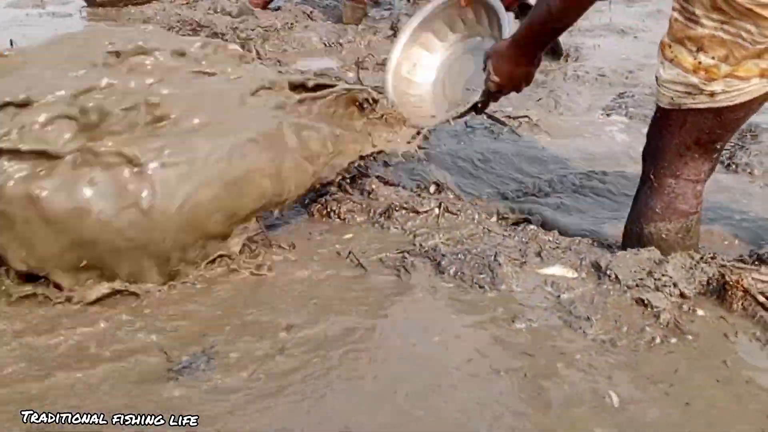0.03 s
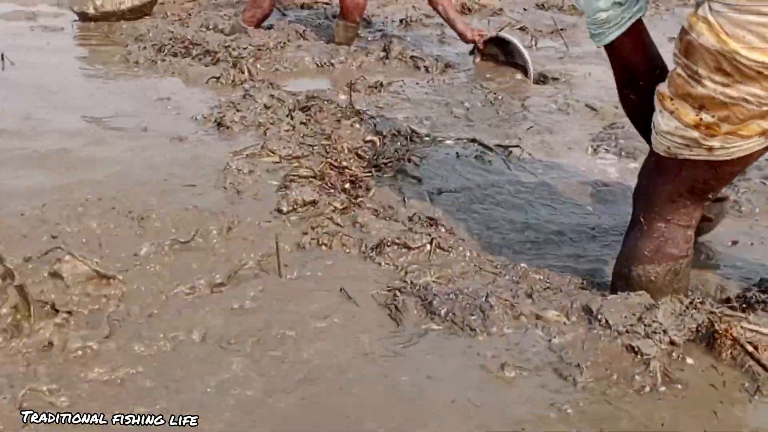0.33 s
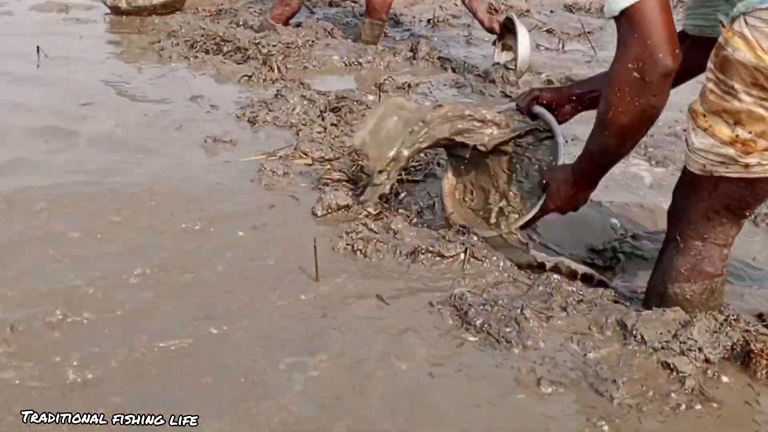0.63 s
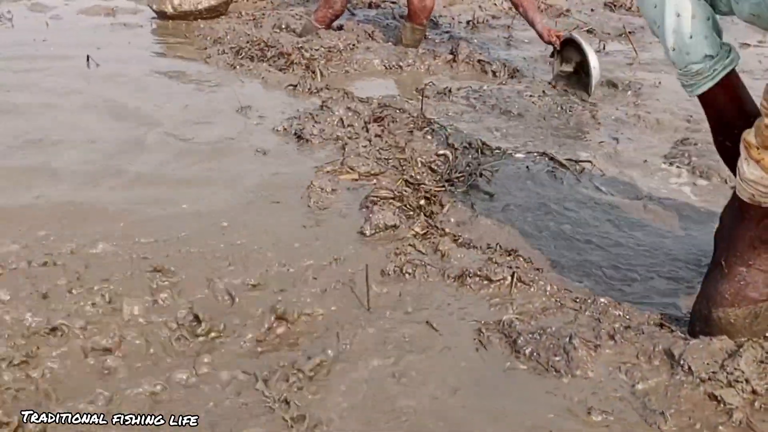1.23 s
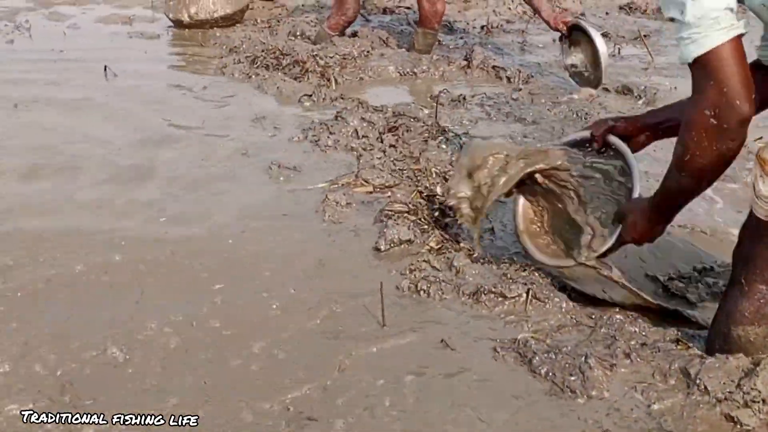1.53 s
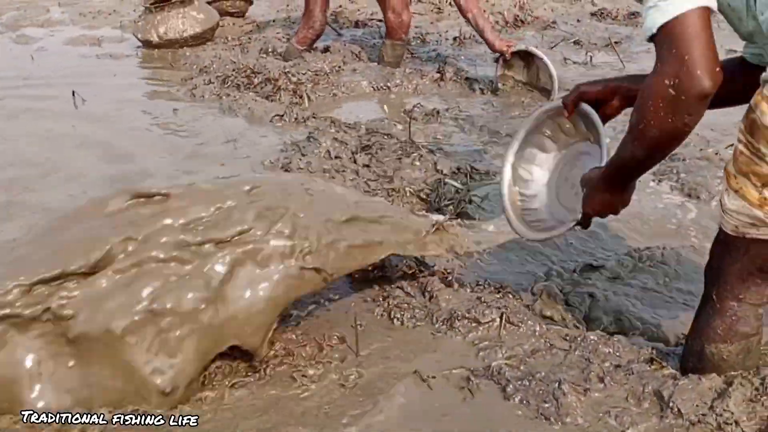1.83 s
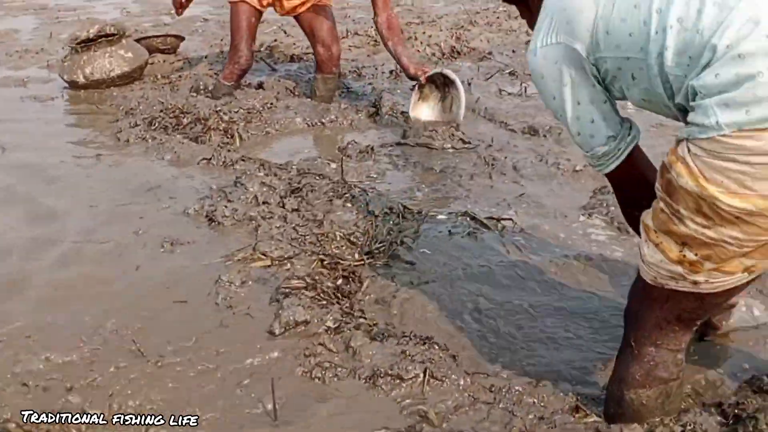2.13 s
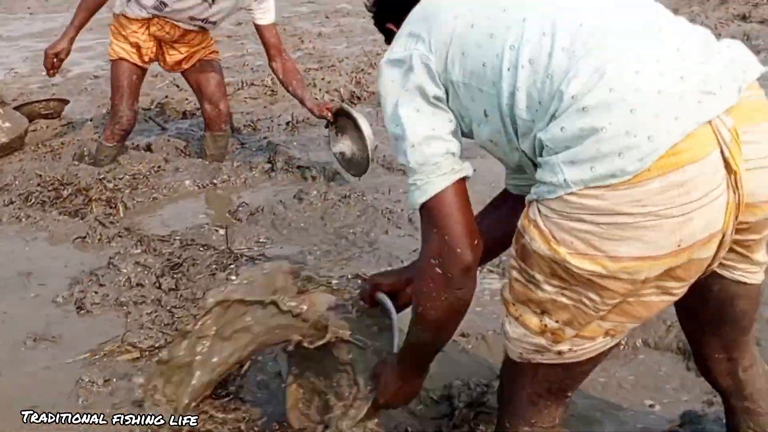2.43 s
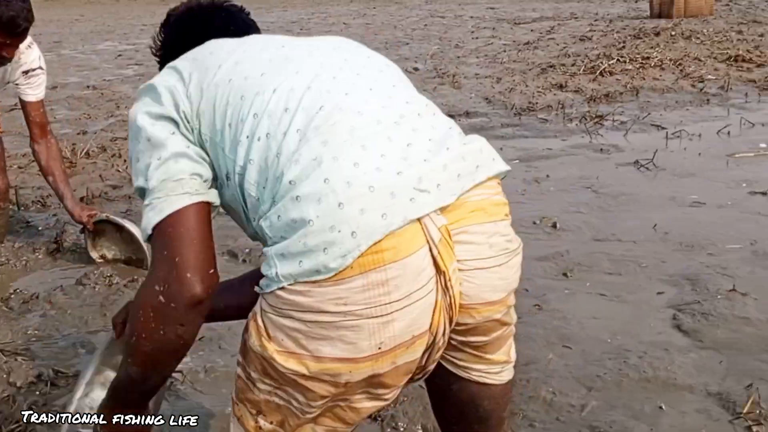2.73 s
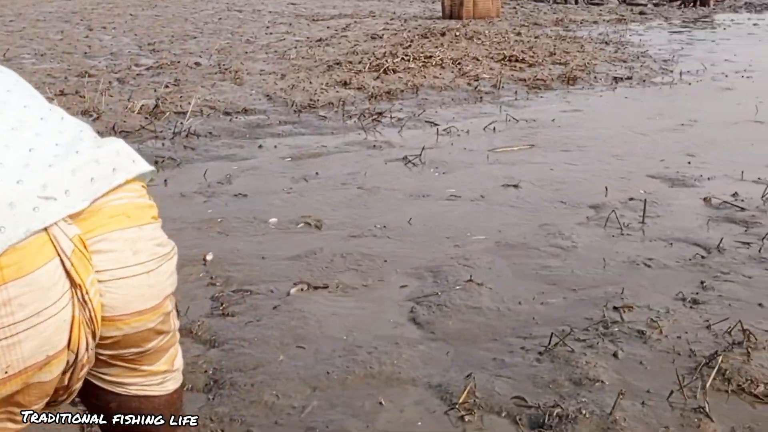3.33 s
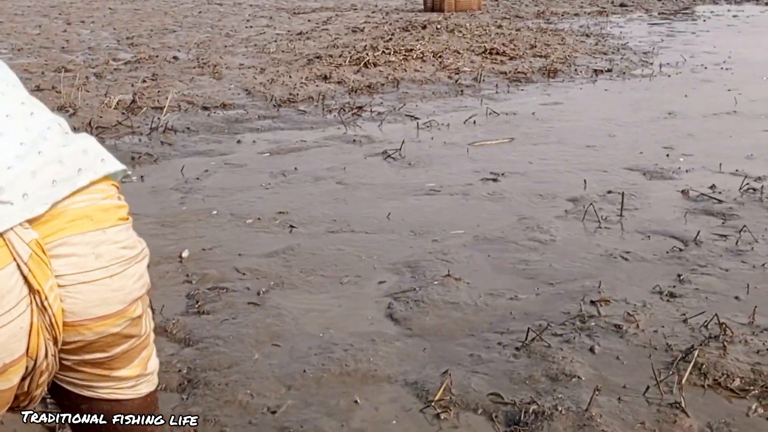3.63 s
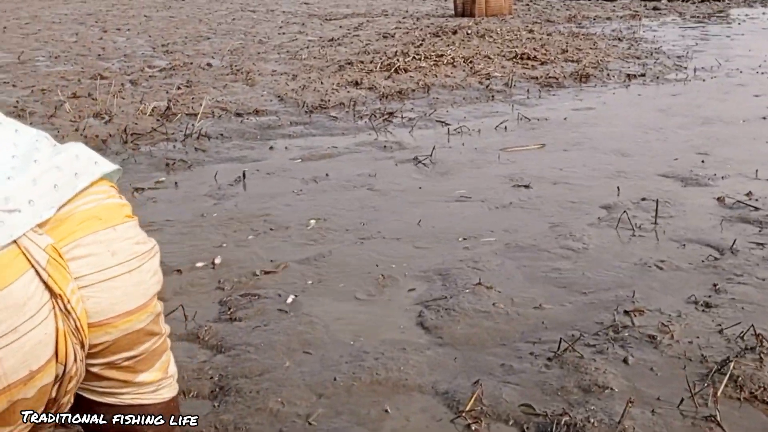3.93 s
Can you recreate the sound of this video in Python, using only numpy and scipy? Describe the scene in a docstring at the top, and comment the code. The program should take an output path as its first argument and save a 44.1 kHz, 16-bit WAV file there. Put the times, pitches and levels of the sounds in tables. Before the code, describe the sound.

Repeated splashes of thrown muddy water, with small drips and a faint, distant engine thudding.

```python
"""Five splashes of muddy water, bailed out of a flooded field with metal bowls. Each throw is a sheet
that hisses as it tears in the air, plunges into the shallows and rains down as spray, bubbles and
slapping lumps; the last two are closer and brighter. Water drips, and the bowl gulps and spatters as
it scoops. Far off, a slow single-cylinder engine, probably a pump, thuds steadily in the open air."""
import sys
import numpy as np
from scipy import signal
from scipy.fft import rfft, irfft, next_fast_len
from scipy.io import wavfile
from scipy.ndimage import uniform_filter1d, minimum_filter1d, map_coordinates

SR = 44100
rng = np.random.default_rng(int(sys.argv[2]) if len(sys.argv) > 2 else 0)


def generate_wav(signal):
    """Clip the signal to [-1, 1] and save it as 16-bit WAV at the path in sys.argv[1]."""
    frames = np.transpose(np.atleast_2d(signal))
    scaled = np.clip(frames, -1, 1) * 32767
    pcm = np.round(scaled).astype(np.int16)
    wavfile.write(sys.argv[1], SR, pcm)


N = 176400

# Fader moves, one list per throw. Each row: time in seconds, then spray, churn and plunge faders in dB.
THROW_FADERS = [
    [(0.0, -29.5, -25, -51), (0.09, -32.5, -38.5, -41), (0.14, -23.5, -29, -32), (0.205, -24.5, -41, -38.5),
     (0.26, -21, -20.5, -29.5), (0.33, -26, -29, -33.5), (0.41, -26.5, -27, -43), (0.55, -34.5, -44, -53.5),
     (0.69, -45.5, -54, -52.5)],
    [(0.78, -40.5, -44.5, -53), (0.85, -41, -48, -56), (0.95, -33, -33, -54), (1.04, -26, -28.5, -31.5),
     (1.1, -26.5, -34, -34.5), (1.15, -20, -27.5, -27), (1.21, -27, -25.5, -35), (1.32, -28.5, -31, -47),
     (1.46, -36.5, -45.5, -61), (1.58, -50.5, -48.5, -57)],
    [(1.71, -47, -57, -54), (1.84, -37, -38, -52), (1.91, -29, -30.5, -36.5), (1.96, -31.5, -35, -41.5),
     (2.03, -20, -21, -24), (2.09, -22.5, -24.5, -30.5), (2.13, -28, -29.5, -33),
     (2.21, -26.5, -29.5, -44.5), (2.41, -49, -48, -57)],
    [(2.5, -35, -40, -45.5), (2.62, -42, -45.5, -56), (2.69, -33.5, -29, -37), (2.85, -22, -26.5, -32.5),
     (2.95, -18.5, -26.5, -33), (3.03, -17.5, -24.5, -32), (3.09, -23, -26, -41), (3.19, -24, -31, -46),
     (3.3, -30, -41.5, -56)],
    [(3.39, -33, -48, -46.5), (3.47, -28, -42, -45), (3.57, -27, -27.5, -40.5), (3.64, -21, -25.5, -33),
     (3.74, -17.5, -25, -25), (3.82, -19, -24, -32.5), (3.92, -26.5, -33.5, -37), (4.0, -23, -24.5, -36.5)],
]
# The brightness that closeness adds to spray and hiss. Each row: frequency in Hz, gain in dB.
CLOSE_EQ = [(1100, -3.5), (2700, 0.5), (4150, 4.5), (5000, -4.5), (6200, 3.5), (10000, 2)]
def throws(close_from_s=2.44, hiss_lead_s=0.017):
    """Thrown water tears, then lands; more water makes denser drops and bubbles."""
    t = np.arange(N) / SR
    times, *faders = np.transpose(np.vstack(THROW_FADERS))
    spray_db, churn_db, plunge_db = [np.interp(t, times, fader) for fader in faders]
    hiss_db = 0.98 * np.interp(t + hiss_lead_s, t, spray_db)  # follows the spray, just ahead of it
    density = amp(0.6 * (spray_db - spray_db.max()))
    clumps_db = clumps()
    drops = patter(density, rate=1500, spread_db=1.5, wash=0.2)
    top = spray(density, drops) * amp(spray_db - 2 + clumps_db)
    body = churn(density) * amp(churn_db + clumps_db / 2)
    weight = plunge(density) * amp(plunge_db)
    top += hiss(density, drops) * amp(hiss_db - 12 + clumps_db / 2)
    close = np.clip((t - close_from_s) * 10, 0, 1)  # a 0.1 s crossfade
    return (1 - close) * top + close * colour(top, CLOSE_EQ) + body + weight


def clumps(per_second=42, depth_db=1.38):
    """Level swings in dB: each clump of water lands at once and fades."""
    hits = rng.exponential(size=N) * (rng.random(N) < per_second / SR)
    energy = signal.lfilter([1], [1, -np.exp(-1 / (0.0088 * SR))], hits)
    swell = np.sqrt(np.abs(energy))
    return depth_db * unit(swell - swell.mean())


# The upper-mid presence of falling drops. Each row: frequency in Hz, gain in dB.
SPRAY_EQ = [(300, -48.5), (1000, -23), (1600, 1.5), (2200, 3), (2900, 1), (3500, -13), (4100, -26),
            (12000, -110)]
def spray(density, drops):
    """Drops rain onto the surface and small bubbles tinkle."""
    tinkle = bubbles(density, rate=410, centre_hz=2441, octaves=0.305, ring=41.8, rise=0.295, spread_db=2.5)
    return unit(colour(drops, SPRAY_EQ)) + amp(-3) * muffle(tinkle)


# The midrange body of stirred water. Each row: frequency in Hz, gain in dB.
CHURN_EQ = [(250, -27), (650, -2.5), (850, 0), (1400, 3.5), (2000, 2.5), (12000, -105)]
def churn(density):
    """Stirred water sloshes and gurgles with mid-sized bubbles."""
    gurgle = bubbles(density, rate=300, centre_hz=1216, octaves=0.343, ring=25, rise=0.11, spread_db=0.5)
    slosh = patter(density, rate=1000, spread_db=5, wash=0.28)
    return muffle(gurgle + unit(colour(slosh, CHURN_EQ)))


# The low weight of the landing. Each row: frequency in Hz, gain in dB.
PLUNGE_EQ = [(60, -35.5), (170, -6), (350, -8.5), (700, 1), (1100, -17.5), (12000, -110)]
def plunge(density):
    """Heavy water drives into the shallows and large cavities ring."""
    cavities = bubbles(density, rate=220, centre_hz=472, octaves=0.542, ring=12, rise=0.098, spread_db=3.5)
    impacts = patter(density, rate=700, spread_db=2, wash=0.63)
    return muffle(0.89 * cavities + unit(colour(impacts, PLUNGE_EQ)))


# The sizzle on top of a throw; the lift near 15 kHz is the recorder's thin, high edge.
# Each row: frequency in Hz, gain in dB.
HISS_EQ = [(1800, -14), (3300, 14), (4000, 6), (4800, -2), (5600, 0), (6500, -6.5), (7900, -11.5),
           (9300, -23.5), (13500, -30), (15200, -23.5)]
def hiss(density, drops):
    """The sheet tears into mist, with a fizz of tiny bubbles."""
    mist = patter(density, rate=4000, spread_db=4, wash=0.28)
    fizz = bubbles(density, rate=300, centre_hz=6030, octaves=0.255, ring=46, rise=0.1, spread_db=7)
    return unit(colour(mist + 0.1 * drops + 0.28 * fizz, HISS_EQ))


# Wet smacks. Each row: start in seconds, peak before EQ in dB, tone in Hz, 60 dB decay in seconds.
SLAP_HITS = [(.109, -22, 2020, .1), (.219, -7.5, 1440, 0.073), (.249, -12.5, 365, 0.065),
             (0.259, -15, 1500, 0.075), (0.287, -12.5, 1500, 0.1), (.86, -21, 1770, 0.037),
             (.943, -18, 1410, 0.051), (0.991, -19.5, 1950, 0.18), (1.112, -7.5, 1750, 0.18),
             (1.148, -13, 1180, 0.13), (1.256, -27, 1740, 0.033), (1.295, -19, 2020, 0.076),
             (1.655, -28, 1920, 0.057), (1.879, -18.5, 1980, 0.16), (1.974, -16, 1810, 0.17),
             (2.092, -9, 1300, 0.057), (2.156, -14, 2560, .04), (2.31, -23.5, 1490, 0.13),
             (2.414, -26, 1280, 0.04), (2.512, -17.5, 1240, 0.052), (2.571, -18, 1610, 0.019),
             (2.649, -24, 1680, 0.14), (2.783, -8, 1650, 0.044), (2.943, -9, 2600, 0.065),
             (3.042, -5.5, 2200, 0.034), (3.174, -6, 2360, .03), (3.322, -11.5, 2420, 0.034),
             (3.814, -5, 2520, .06), (3.853, -7.5, 1680, 0.018)]
def slaps():
    """Each lump of mud and water lands with a sudden, broad burst that dies at once."""
    out, t = np.zeros(N), np.arange(SR // 8) / SR
    for start, db, hz, t60 in SLAP_HITS:
        band = signal.butter(1, [hz / 1.14, min(hz * 1.4, SR / 3)], 'band', fs=SR)
        noise = signal.lfilter(*band, rng.standard_normal(len(t)))
        add(out, start, at_peak(amp(-60 * t / t60) * noise, db))
    return colour(out, [(80, 5.5), (250, 6.5), (3300, 0.5), (4700, -14.5), (6200, -12), (14000, -54)])


# Plinks. Each row: start in seconds, peak in dB, starting pitch in Hz, 60 dB decay in seconds.
DRIP_NOTES = [(.009, -13, 995, 0.04), (.251, -11.5, 787, 0.088), (.566, -14.5, 2700, 0.0036),
              (0.746, -20, 1290, 0.019), (0.997, -22, 4940, 0.0038), (1.544, -28.5, 1165, 0.036),
              (2.063, -7.5, 922, 0.024), (2.368, -25.5, 2960, .02), (2.513, -17, 1027, 0.053),
              (3.409, -10.5, 3250, 0.0032), (3.409, -27, 5900, 0.007)]
def drips(rise=0.17, attack_s=0.00058):
    """A drip or pocket of air rings as one bubble, rising a little in pitch."""
    out, t = np.zeros(N), np.arange(SR // 10) / SR
    for start, db, hz, t60 in DRIP_NOTES:
        pitch = hz * (1 + rise * np.minimum(t / t60, 1))
        envelope = amp(-60 * t / t60) * (1 - np.exp(-t / attack_s))
        add(out, start, at_peak(envelope * sine(pitch), db))
    return out


# Hollow scoops. Each row: start in seconds, level in dB, pitch in Hz, 60 dB decay in seconds,
# glide in octaves per second.
GULP_NOTES = [(.561, -25, 756, 0.17, -1.5), (2.326, -30, 630, 0.17, 3.5), (2.522, -25.5, 788, 0.097, -1),
              (2.68, -26, 525, .14, -1), (2.735, -21, 487.5, 0.25, -0.5)]
def gulps(attack_s=0.00093):
    """An air pocket under the bowl rings unsteadily and glides as it changes size."""
    out, t = np.zeros(N), np.arange(SR // 4) / SR
    for start, db, hz, t60, glide in GULP_NOTES:
        pitch = hz * 2 ** (glide * t + 0.047 * wobble(250)[:len(t)])
        flutter_db = 3.5 * wobble(190)[:len(t)]
        envelope = amp(db - 60 * t / t60 + flutter_db) * (1 - np.exp(-t / attack_s))
        add(out, start, envelope * sine(pitch))
    return out


# Flicks of water off the rim. Each row: start in seconds, level in dB, 60 dB decay in seconds.
SPATTER_CUES = [(.735, -48.5, 0.44), (1.633, -37.5, 0.057), (1.658, -45, 0.15), (2.414, -42, 0.036),
                (2.478, -45, 0.38)]
# Their thin, bright tone. Each row: frequency in Hz, gain in dB.
SPATTER_EQ = [(1500, -33), (3500, 7), (7500, 0), (10000, -14.5)]
def spatters(attack_s=0.002):
    """A quick fan of tiny droplets leaves the rim as the bowl cuts in and lifts."""
    envelope, t = np.zeros(N), np.arange(SR // 4) / SR
    for start, db, t60 in SPATTER_CUES:
        add(envelope, start, amp(db - 60 * t / t60) * (1 - np.exp(-t / attack_s)))
    droplets = patter(np.ones(N), rate=2000, spread_db=6, wash=0.43)
    return envelope * unit(colour(droplets, SPATTER_EQ))


def bank_echo(water, t60=0.051, build_s=0.014):
    """The banks and wet ground scatter back a short, faint tail."""
    t = np.arange(SR // 4) / SR
    tail = rng.standard_normal(len(t)) * amp(-60 * t / t60) * (1 - np.exp(-t / build_s))
    return amp(-15.5) * signal.fftconvolve(water, tail / np.linalg.norm(tail))[:N]


def engine(firing_hz=14.854, first_s=0.0472, thud_hz=118.2, sag_hz_per_s=3200, width_s=0.0046):
    """One soft exhaust thud per firing, sagging in pitch; distance leaves only the bass."""
    cycles = (np.arange(N) / SR - first_s) * firing_hz
    firing = np.round(cycles).astype(int)
    t = (cycles - firing) / firing_hz  # seconds from the middle of the nearest thud
    level = amp(-32.5 + rng.standard_normal(firing.max() + 2))[firing]
    envelope = level * np.exp(-0.5 * (t / width_s) ** 2)
    return -envelope * np.cos(2 * np.pi * (thud_hz - sag_hz_per_s * t / 2) * t)


# The outdoor bed: low rumble and faint hiss. Each row: frequency in Hz, gain in dB.
AIR_EQ = [(20, -46), (70, 3), (150, -0.5), (300, -25), (3000, -12.5), (5000, -27), (14000, -43)]
def open_air():
    """Steady, quiet noise over the field."""
    return amp(-51.5) * unit(colour(rng.standard_normal(N), AIR_EQ))


def scatter(density, rate, spread_db):
    """Sample positions and sizes of drops, rate a second on average; sparse ones count for more."""
    total = np.cumsum(density / density.mean())
    when, how_big = rng.random((int(rate * N / SR), 2)).T
    at = np.minimum(np.searchsorted(total, when * total[-1]), N - 1)
    size_db = spread_db * np.minimum(-np.log(1 - how_big), np.pi)
    return at, amp(size_db) / np.sqrt(density[at])


def patter(density, rate, spread_db, wash):
    """Sharp impacts over a wash of tiny ones; the wash thins first, so lulls are single drops."""
    at, size = scatter(density, rate, spread_db)
    impacts = np.bincount(at, size * rng.choice([-1, 1], len(at)), N)
    return unit(impacts) + wash * density ** 0.35 * rng.standard_normal(N)


def bubbles(density, rate, centre_hz, octaves, ring, rise, spread_db):
    """A cloud of bubbles, each a damped, rising tone; ring scales how many cycles they last."""
    at, size = scatter(density, rate, spread_db)
    hz = np.minimum(centre_hz * 2 ** (octaves * rng.standard_normal((len(at), 1))), SR / 4)
    samples = np.arange(SR // 30)
    cycles = hz * samples / SR
    age = np.minimum(cycles / (ring * rng.uniform(0.81, 2.93, hz.shape)), 2)  # 1 at 60 dB down
    level = size[:, None] * np.sqrt(np.minimum(hz / centre_hz, 1))
    envelope = level * amp(-60 * age) * (1 - np.exp(-2 * cycles))
    tones = envelope * np.sin(2 * np.pi * cycles * (1 + rise * age / 2))
    return unit(np.bincount((at[:, None] + samples).ravel(), tones.ravel(), N)[:N])


def colour(x, points):
    """Causal EQ through (Hz, dB) points."""
    m = 2 * next_fast_len(N // 2 + SR // 4)
    hz, db = np.transpose(points)
    curve_db = np.interp(np.log(np.fft.rfftfreq(m, 1 / SR) + 1), np.log(hz), db)
    cepstrum = irfft(np.log(amp(curve_db)))
    cepstrum[1:m // 2] *= 2  # minimum phase: nothing rings ahead of a hit
    cepstrum[m // 2 + 1:] = 0
    return irfft(rfft(x, m) * np.exp(rfft(cepstrum)), m)[:N]


def muffle(x):
    """Cut the treble steeply and scale to rms 1."""
    return unit(signal.sosfilt(signal.butter(8, 3700, fs=SR, output='sos'), x))


def wobble(rate):
    """A smooth random curve, rate knots a second."""
    return map_coordinates(rng.standard_normal(int(N * rate / SR) + 4), [np.arange(N) * rate / SR])


def sine(hz):
    """A tone that follows a pitch curve."""
    return np.sin(2 * np.pi * np.cumsum(hz) / SR)


def amp(db):
    """Decibels to gain."""
    return 10 ** (np.asarray(db) / 20)


def unit(x):
    """Scale to rms 1."""
    return x / np.sqrt(np.mean(x ** 2) + 1e-20)


def at_peak(sound, db):
    """Scale to a peak level."""
    return amp(db) * sound / np.abs(sound).max()


def add(track, start_s, sound):
    """Mix a sound into a track."""
    i = max(0, round(start_s * SR))
    track[i:i + len(sound)] += sound[:max(0, N - i)]


def scene():
    """Water up front, its faint echo, the far engine and open air, in mono."""
    water = throws() + spatters() + slaps() + drips() + gulps()
    return (water + bank_echo(water) + engine() + open_air())[None]


def record(dry, ceiling=0.57, hold_s=0.003, low_cut_hz=42, top_hz=15650):
    """A quick limiter holds down the peaks; a gentle high-pass trims the deepest bass, and the recorder's cut-
    off ends the treble."""
    hold = round(hold_s * SR)
    gain = ceiling / np.maximum(np.abs(dry), ceiling)
    limited = dry * uniform_filter1d(minimum_filter1d(gain, hold), hold)
    trimmed = signal.sosfilt(signal.butter(3, low_cut_hz, 'high', fs=SR, output='sos'), limited)
    m = next_fast_len(N + SR // 2)
    passband = np.fft.rfftfreq(m, 1 / SR) < top_hz
    return irfft(rfft(trimmed, m) * passband, m)[..., :N]


dry = scene()
out = record(dry)
generate_wav(out)
```